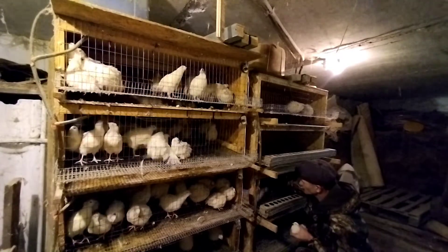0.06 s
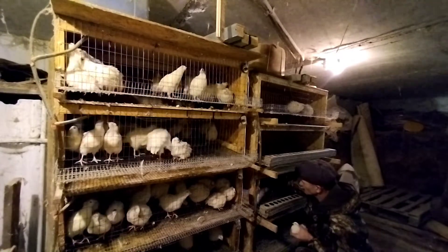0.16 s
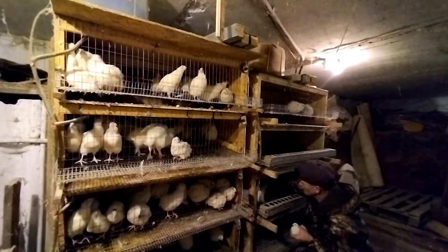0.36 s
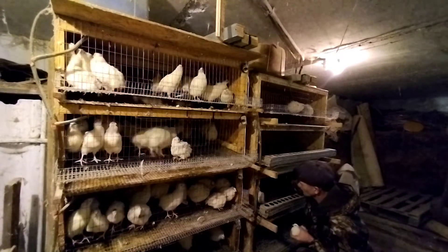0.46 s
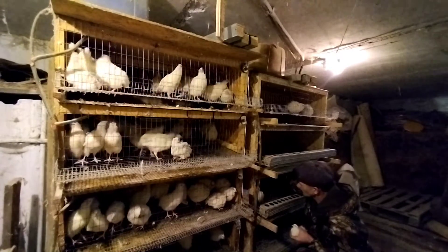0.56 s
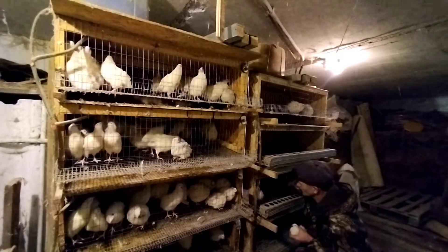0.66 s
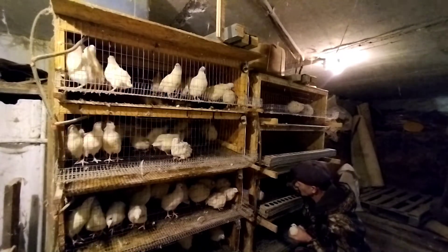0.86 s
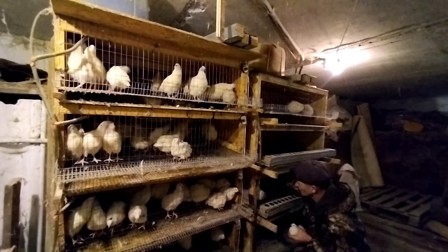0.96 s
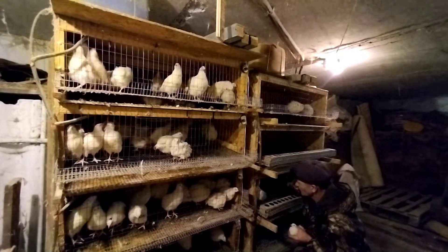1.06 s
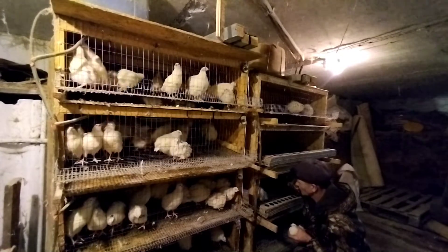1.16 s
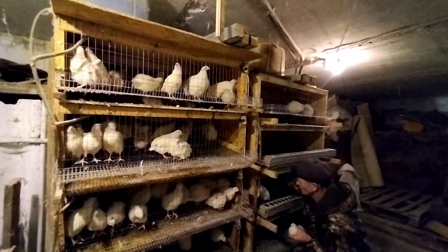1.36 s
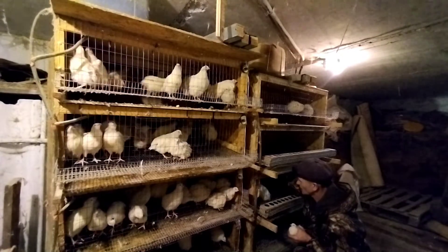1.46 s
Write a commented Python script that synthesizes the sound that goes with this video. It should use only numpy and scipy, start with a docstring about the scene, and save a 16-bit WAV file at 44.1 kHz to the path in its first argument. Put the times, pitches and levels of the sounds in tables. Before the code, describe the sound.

Loud, slightly clipped quail crow near the microphone, two brief chirps before a harsh rippling trill that falls away hoarsely; stamps knock the wooden rack, claws scratch wire, and a short boxy room ring follows.

```python
"""Birds shuffle and scratch on a wooden rack in a low shed: a patchy two-channel noise wash and bursts of grit.
Close by, a quail crows two short notes, then a trill of whistles, mostly rising, that break into rasps.
Whistles are fuzzy sliding sines, rasps are tone and noise chopped into beats; airy hiss follows both.
The crow rings shortly in the shed. Stamps, one just before the trill and two near its end, ring
the rack as decaying sines. The recorder clips whatever exceeds full scale."""
import sys
import numpy as np
from scipy import signal
from scipy.io import wavfile
from scipy.ndimage import uniform_filter1d

SR = 44100
rng = np.random.default_rng(int(sys.argv[2]) if len(sys.argv) > 2 else 0)


def to_wav(sig):
    """Store sig (one row per channel, or 1-D mono) as 16-bit WAV at the path in sys.argv[1].

    Samples outside -1..1 are clipped; the rate is SR.
    """
    pcm = np.clip(np.atleast_2d(sig), -1, 1) * 32767
    pcm = np.round(pcm).astype(np.int16)
    wavfile.write(sys.argv[1], SR, pcm.T)  # frames by channels


def how_loud(loudness_db):
    """Turn decibels into a plain amplitude multiplier (0 dB gives 1, 20 dB gives 10)."""
    steps = np.asarray(loudness_db, float) / 20
    return 10 ** steps


N = 66150
T = np.arange(N) / SR

# spectrum of the shuffling, relative: (frequency [Hz], density [dB per Hz])
SHUFFLE_COLOUR = [(40, -4.5), (135, -11), (350, -5.5), (510, -10), (760, -4.5), (1100, -6.5), (1620, -11),
                  (2800, -16.5), (5000, -26), (12900, -27.5), (15500, -29.5)]
# level of the shuffling as it reaches the listener, drawn by hand: it sinks while the loud trill
# holds the recorder's gain down: (time [s], level [dB])
SHUFFLE_LEVEL = [(0, -32.5), (.12, -39.5), (.24, -27.5), (.35, -38.5), (.52, -27), (.8, -38.5), (1.03, -30),
                 (1.35, -35.5), (1.44, -32.5), (1.5, -27.5)]
# stereo likeness of the shuffling: (frequency [Hz], left-right likeness [0 to 1])
SHUFFLE_LIKENESS = [(100, 1), (400, 0.87), (2400, 0)]
# claws on wire: (start [s], level [dB], time to fall 60 dB [s])
CLAW_SCRATCHES = [(0.013, -37, 0.1), (1.376, -28, 0.045), (1.455, -36, 0.23)]
# feet striking the rack, scaling all its resonances: (start [s], level [dB])
FOOT_STAMPS = [(0.458, -20.5), (1.002, -10), (1.057, -12.5)]
# resonances of the wood, before random tinting: (frequency [Hz], level [dB], time to fall 60 dB [s])
RACK_MODES = [(137.7, -13.5, 0.42), (240, -12.5, 0.056), (397.6, -12.5, 0.066), (585, -23, 0.19)]
# whistles, most of which hold low and flick upwards:
# (start [s], length [s], level before the swell [dB], start pitch [Hz], end pitch [Hz])
WHISTLE_NOTES = [(0.186, 0.049, -13.5, 1491, 1576), (0.32, 0.038, -12, 1348, 2115),
                 (0.345, 0.042, -20, 1454, 1125), (0.488, 0.048, -12.5, 1506, 2715),
                 (.54, 0.031, -9, 1557, 2366), (.585, 0.04, -8.5, 1601, 2340),
                 (0.635, .034, -6.5, 1637, 2890), (0.685, .023, -7, 1707, 2570),
                 (0.707, .016, -9, 1732, 2270), (0.732, 0.027, -6.5, 1955, 2930),
                 (.765, 0.015, -11, 1694, 2160), (0.79, .02, -5.5, 2008, 2920),
                 (0.818, 0.028, -13.5, 1934, 1756), (0.856, .029, -9, 1647, 2225),
                 (0.914, 0.024, -15.5, 1503, 1716), (0.941, .014, -6.5, 1614, 2010),
                 (0.993, 0.023, -13.5, 1592, 1764)]
# growing roughness of the voice late in the crow: (time [s], factor)
HOARSENESS = [(.8, 1), (.9, 1.8)]
# hoarse notes, mostly in a higher band:
# (start [s], length [s], level before the swell [dB], start pitch [Hz], end pitch [Hz])
RASP_NOTES = [(.345, 0.019, -26.5, 3743, 3604), (.522, 0.017, -15, 2667, 2850),
              (.56, 0.029, -15.5, 2810, 2920), (.62, 0.025, -12, 3728, 3115),
              (0.663, 0.027, -13, 3067, 3612), (.70, 0.044, -11.5, 2500, 3300),
              (0.759, 0.03, -11, 2532, 3370), (.805, 0.031, -13.5, 2405, 2930),
              (.835, .04, -11, 3900, 3248), (.88, 0.061, -9, 3550, 2760), (0.943, .05, -14, 3110, 2047),
              (1.0, 0.043, -19.5, 2433, 2340), (1.045, 0.046, -21, 2500, 1765),
              (1.051, 0.047, -25.5, 1377, 1126), (1.12, 0.06, -28.5, 2863, 2084)]
# airy treble of the crow, relative: (frequency [Hz], density [dB per Hz])
HISS_COLOUR = [(4300, -22.5), (5800, -4.5), (8000, -14), (11500, -8.5), (15500, -10)]
# decay of the shed: (frequency [Hz], time to fall 60 dB [s])
SHED_DECAY = [(300, 0.086), (2000, 0.23), (12000, 0.02)]

FLICK_POWER, OCTAVE_DB = 3.2, -27  # how late the pitch climbs; level of the second partial
SWELL_PEAK = 0.72  # share of a whistle spent swelling
WAVER = 0.22  # pitch unsteadiness, times smoothed noise
HALO_SHARE, HALO_WIDTH_HZ = 0.33, 340  # fuzz in a fully strained whistle, before hoarseness
THROB_DEPTH = 0.4  # in a fully strained whistle
STRAIN_HZ = 700  # a flick this wide is fully strained; flatter notes are purer
BEATS_PER_S, RASP_BEAT_DEPTH = 149.6, 0.53  # the centre rate, around which the beats drift
RASP_TONE_SHARE, RASP_WIDTH_HZ = 0.4, 1000
HISS_WHISTLE_DB, HISS_RASP_DB = -16.5, -12  # breath noise relative to each kind of note
HISS_SMOOTH_S, HISS_LIKENESS = 0.026, 0.58
WET_DB, EARLY_DB = -8, -11
PAN_DB, LAG_SAMPLES = 1.58, 4  # direct sound: louder on the left, later on the right


def evened(x):
    """Scales a sound to an rms of one."""
    return x / np.sqrt(np.mean(x ** 2) + 1e-20)


def read(points, hz):
    """Reads a curve along a logarithmic frequency axis."""
    f, value = np.transpose(points)
    return np.interp(np.log(hz + 1), np.log(f + 1), value)


def add(mix, start, sound):
    """Lays a sound into the mix in place, from a start in seconds."""
    part = mix[round(start * SR):][:len(sound)]
    part += sound[:len(part)]


def noise(spectrum, likeness, patchy_db):
    """Two-channel noise of a given colour, with patches that drift over time and frequency."""
    frames, hz = N // 128 + 5, np.fft.rfftfreq(512, 1 / SR)
    a, b, c, d, patches = rng.standard_normal((frames, 257, 5)).T
    patches = uniform_filter1d(patches, size=6, axis=0)
    patches = evened(uniform_filter1d(patches, size=16, axis=1))
    same = np.clip(likeness(hz), -1, 1)[:, None]
    left = a + 1j * b
    right = same * left + np.sqrt(1 - same ** 2) * (c + 1j * d)
    z = np.array([left, right])
    z *= how_loud(read(spectrum, hz)[:, None] + patchy_db * patches)
    return signal.istft(z, nperseg=512, noverlap=384)[1][:, :N]


def shuffle():
    """Many feet and feathers blend into a lumpy wash of coloured noise."""
    wash = noise(SHUFFLE_COLOUR, lambda hz: read(SHUFFLE_LIKENESS, hz), patchy_db=2.5)
    return how_loud(np.interp(T, *np.transpose(SHUFFLE_LEVEL))) * evened(wash)


def rack():
    """Claws scratch the wire as decaying spiky noise; stamps ring the frame as decaying sines."""
    stamps, claws, t = np.zeros(N), np.zeros(N), T[:SR // 3]
    for start, db, t60 in CLAW_SCRATCHES:
        add(claws, start, how_loud(db - 60 * t / t60) * np.minimum(t / 0.0065, 1))
    tints = rng.standard_normal((len(FOOT_STAMPS), len(RACK_MODES)))
    for (start, db), tint in zip(FOOT_STAMPS, tints):
        ring = np.zeros(len(t))
        for (hz, mode_db, t60), c in zip(RACK_MODES, tint):
            # each stamp excites the modes in a different balance
            ring += how_loud(mode_db + 3.7 * c - 60 * t / t60) * np.sin(2 * np.pi * hz * t)
        add(stamps, start, how_loud(db) * np.minimum(t / 0.0019, 1) * ring)
    grit = rng.standard_normal(N + 1) * how_loud(2.5 * rng.exponential(1, N + 1))
    return stamps + claws * evened(np.diff(grit))


def resonate(x, hz, width_hz):
    """A gliding resonance: shifts the curve hz to zero, smooths twice, shifts back."""
    turn = np.exp(2j * np.pi * np.cumsum(hz) / SR)
    r = np.exp(-np.pi * width_hz / SR)
    return 2 * (turn * signal.lfilter([(1 - r) ** 2], [1, -2 * r, r * r], x / turn)).real


def whistle(start, length, db, from_hz, to_hz, air):
    """A wavering sine with a fuzzy halo throbs and swells while its pitch flicks late, then stops."""
    u = np.arange(0, 1, 1 / (length * SR))
    air = air[round(start * SR):][:len(u)]
    hz = from_hz + (to_hz - from_hz) * u ** FLICK_POWER
    turns = np.cumsum(hz * (1 + WAVER * uniform_filter1d(air, size=120))) / SR
    tone = np.sin(2 * np.pi * turns) + how_loud(OCTAVE_DB) * np.sin(4 * np.pi * turns)
    strain = np.clip(abs(to_hz - from_hz) / STRAIN_HZ, 0.4, 1)
    rough = HALO_SHARE * strain * np.interp(start, *np.transpose(HOARSENESS))
    halo = resonate(air, hz, HALO_WIDTH_HZ)
    voice = (1 - rough) * evened(tone) + rough * evened(halo)
    beat_turns = np.cumsum(BEATS_PER_S * (1 + 4.4 * uniform_filter1d(air, size=90))) / SR
    voice = voice * np.exp(THROB_DEPTH * strain * np.cos(2 * np.pi * beat_turns))
    # bending time puts the top of the swell at SWELL_PEAK
    shape = np.sin(np.pi * u ** (np.log(0.5) / np.log(SWELL_PEAK))) ** 0.6
    return start, how_loud(db) * shape * evened(voice)


def rasp(start, length, db, from_hz, to_hz, air):
    """An unsteady tone and a broad band of air slide together, chopped into quick beats."""
    u = np.arange(0, 1, 1 / (length * SR))
    air = air[round(start * SR):][:len(u)]
    hz = from_hz + (to_hz - from_hz) * u
    drift = uniform_filter1d(air, size=90)
    beat_turns = np.cumsum(BEATS_PER_S * (1 + 2.79 * drift)) / SR
    beats = np.exp(RASP_BEAT_DEPTH * np.cos(2 * np.pi * beat_turns))
    tone = np.sin(2 * np.pi * np.cumsum(hz * (1 + 0.5 * drift)) / SR)
    breath = resonate(air, hz, RASP_WIDTH_HZ)
    voice = RASP_TONE_SHARE * evened(tone) + (1 - RASP_TONE_SHARE) * evened(breath)
    shape = np.sin(np.pi * u) ** 0.4
    return start, how_loud(db) * shape * evened(beats * voice)


def crow():
    """The quail's voice: whistles in the first row, rasps in the second, each with its own air."""
    voice, air = np.zeros((2, N)), rng.standard_normal((2, N))
    for note in WHISTLE_NOTES:
        add(voice[0], *whistle(*note, air[0]))
    for note in RASP_NOTES:
        add(voice[1], *rasp(*note, air[1]))
    return voice


def hiss(voice):
    """Airy treble noise that follows the smoothed strength of the notes."""
    power = how_loud(2 * HISS_WHISTLE_DB) * voice[0] ** 2 + how_loud(2 * HISS_RASP_DB) * voice[1] ** 2
    strength = np.sqrt(abs(uniform_filter1d(power, round(HISS_SMOOTH_S * SR))))
    treble = noise(HISS_COLOUR, lambda hz: HISS_LIKENESS + 0 * hz, patchy_db=3.5)
    return strength * evened(treble)


def shed(x):
    """Direct sound, a few early reflections and a sparse decaying tail for each microphone."""
    taps = np.zeros((2, SR // 2))
    # one tap of random sign at a random place in every 20 samples
    at = np.arange(400, SR // 2 - 20, 20) + rng.integers(0, 20, (2, (SR // 2 - 401) // 20))
    np.put_along_axis(taps, at, rng.choice([-1., 1.], at.shape), 1)
    hz, t, z = signal.stft(taps, SR, nperseg=256)
    decay = how_loud(-60 * t / read(SHED_DECAY, hz)[:, None])
    response = signal.istft(z * decay, SR, nperseg=256)[1]
    response *= how_loud(WET_DB) / np.linalg.norm(response[0])
    early = rng.integers(40, 900, (2, 6))
    # later reflections are weaker, by 1 dB per 100 samples
    reflections = how_loud(EARLY_DB - early / 100) * rng.choice([-1., 1.], early.shape)
    np.put_along_axis(response, early, reflections, 1)
    response[0, 0], response[1, LAG_SAMPLES] = how_loud(PAN_DB), how_loud(-PAN_DB)
    return signal.fftconvolve(x, response, axes=1)[:, :N]


def scene():
    """The shed colours the crow and its hiss; rack and shuffling are added as they are."""
    wash = shuffle()
    knocks = rack()
    voice = crow()
    return shed(voice.sum(0) + hiss(voice)) + knocks + wash


def low_pass(x):
    """Removes everything above the highest recorded frequency."""
    return signal.sosfilt(signal.butter(12, 15620, fs=SR, output="sos"), x)


def record(dry):
    """The recorder cuts the bass, then clips hard at full scale."""
    bass_cut = signal.butter(2, 116, "high", fs=SR, output="sos")  # corner in Hz
    mix = np.clip(signal.sosfilt(bass_cut, dry), -1, 1)
    return low_pass(mix)


dry = scene()
out = record(dry)
to_wav(out)
```